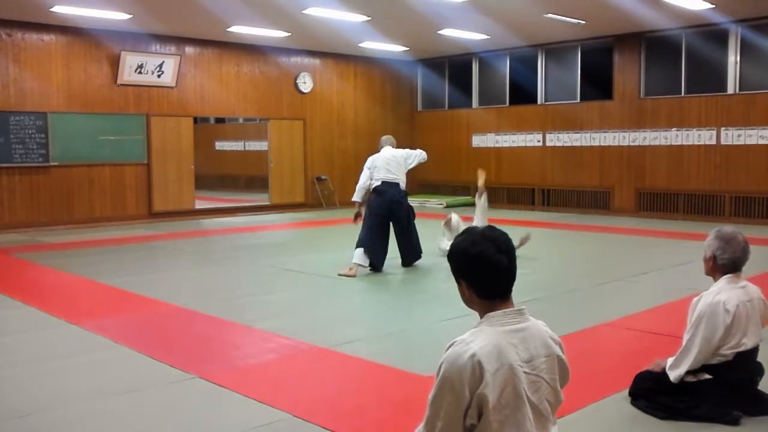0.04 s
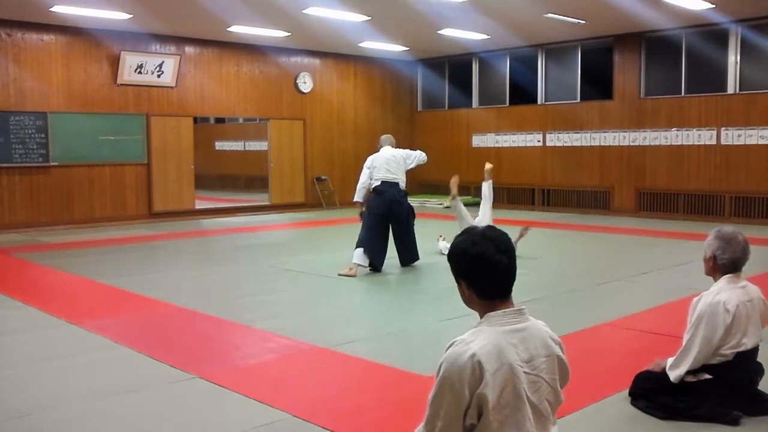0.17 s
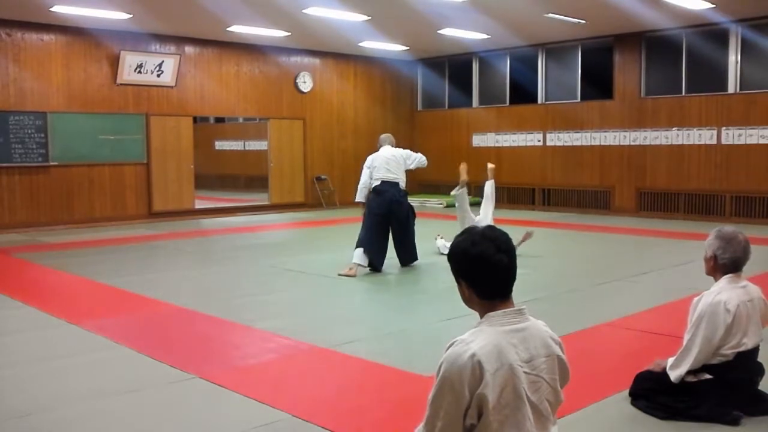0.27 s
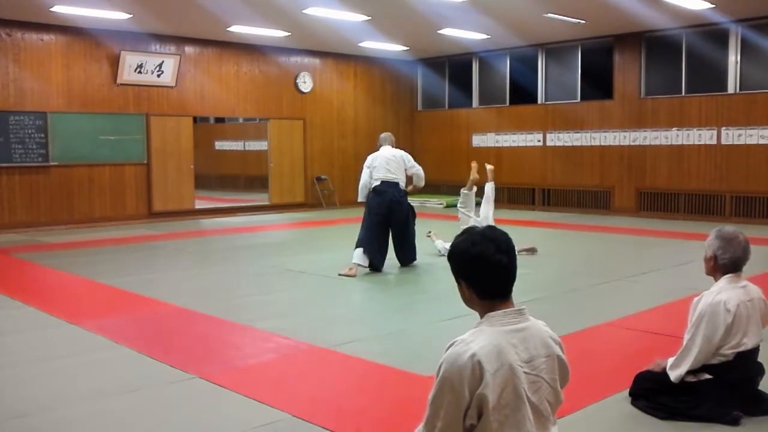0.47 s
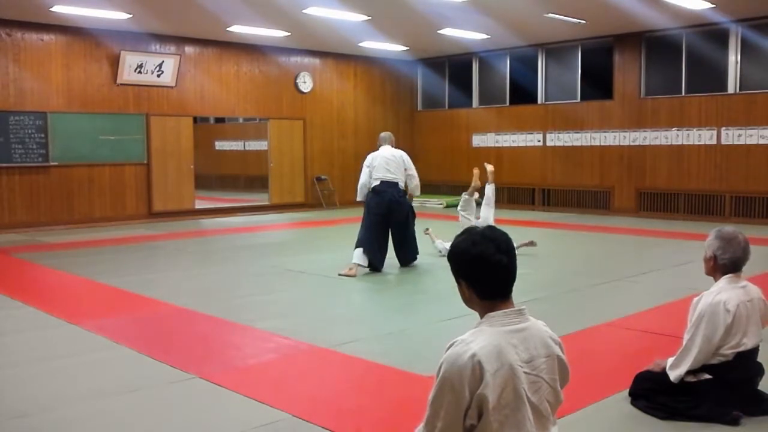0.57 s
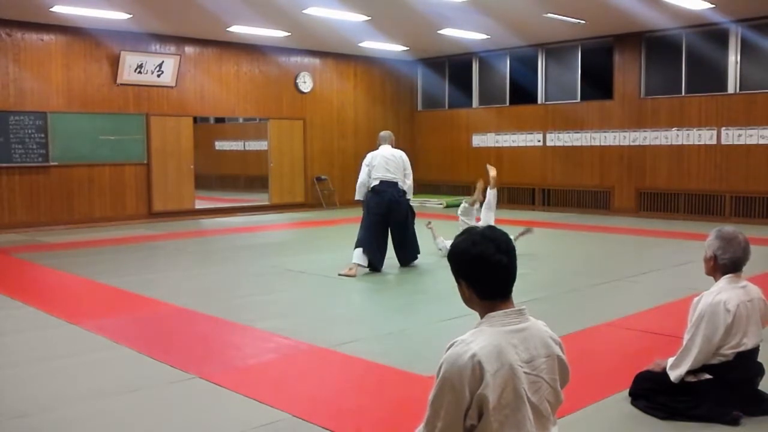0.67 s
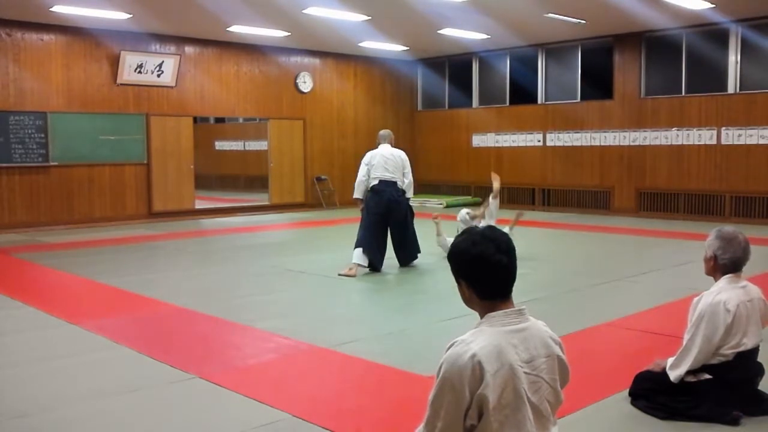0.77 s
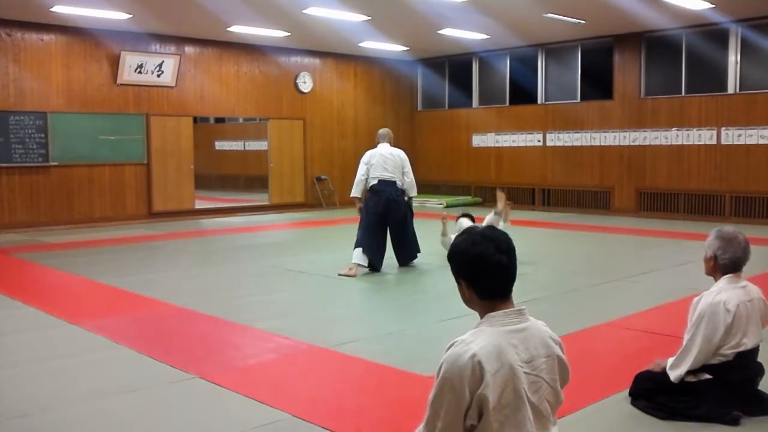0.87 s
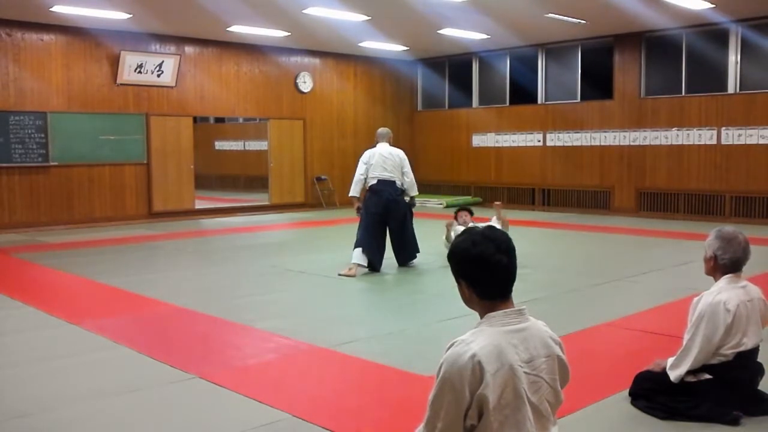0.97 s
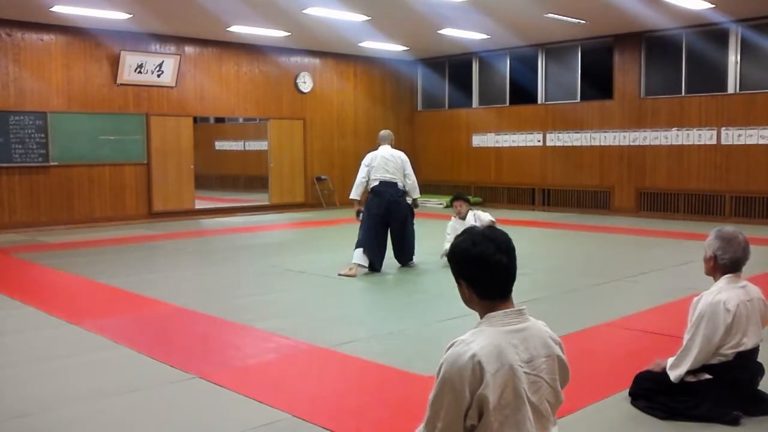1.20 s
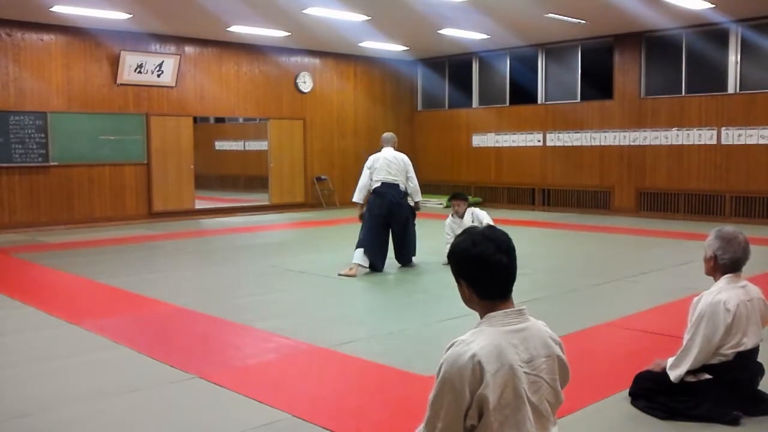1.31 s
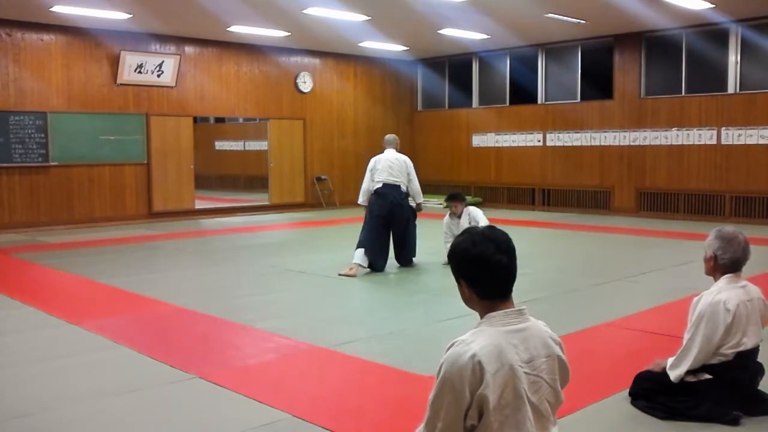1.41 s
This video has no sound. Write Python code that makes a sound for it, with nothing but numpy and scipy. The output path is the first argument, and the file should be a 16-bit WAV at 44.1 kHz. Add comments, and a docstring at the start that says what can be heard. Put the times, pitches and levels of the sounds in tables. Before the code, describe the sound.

After a faint cloth swish and low floor rumble, a thrown body hits padded mats with a sharp slap and deep boom; the hall echoes for about a second, heard from a distance over faint hum.

```python
"""A person is thrown onto padded mats in a wood-panelled training hall.
Limbs and back slap the mat covers as noise cracks; padding and sprung floor boom as damped sines.
The hall answers with bands of noise that each die at their own rate, about a second in all.
Cloth swishes and footwork rumbles before the landing, and a light touch on the mat follows it.
Mains hum, hiss and room rumble lie under it all, and the loudest peaks overload."""
import sys
import numpy as np
from scipy import signal
from scipy.fft import rfft, irfft
from scipy.io import wavfile

SR = 44100
rng = np.random.default_rng(int(sys.argv[2]) if len(sys.argv) > 2 else 0)


def log_audio(samples):
    """Write samples as a 16-bit WAV file to the path given in sys.argv[1]."""
    # one column per channel
    frames = np.atleast_2d(samples).T
    # limit to full scale, then quantise
    limited = np.clip(frames, -1, 1)
    pcm = np.round(limited * 32767).astype(np.int16)
    wavfile.write(sys.argv[1], SR, pcm)


N = 63945  # length in samples, 1.45 s
LANDING_S = 0.2435


def undb(db):
    """Decibels to gain."""
    return 10 ** (np.asarray(db) / 20)


def since(start):
    """Seconds since a moment, zero before it."""
    return np.maximum(np.arange(N) / SR - start, 0)


def along(hz, points, axis=1):
    """Read a column of a table on a log-frequency axis."""
    points = np.array(points, float)
    log_hz = np.log(np.maximum(hz, 1))
    return np.interp(log_hz, np.log(points[:, 0]), points[:, axis])


def noise(colour):
    """Noise of rms 1 with the given spectrum, falling away below its first point."""
    hz = np.arange(N // 2 + 1) * SR / N
    low_cut = np.minimum(hz / colour[0][0], 1) ** 2
    gain = undb(along(hz, colour)) * low_cut
    random_phase = np.exp(2j * np.pi * rng.random(len(hz)))
    x = irfft(gain * random_phase, N)
    return x / x.std()


def decay_time(t60):
    """Time constant of an exponential that falls 60 dB in t60 seconds."""
    return t60 / np.log(1000)


def burst(start, rise, decay):
    """Quick rise and exponential fall, both given as time constants in seconds."""
    t = since(start)
    return (1 - np.exp(-t / rise)) * np.exp(-t / decay)


def ring(modes, rise):
    """Damped sine modes set going by the landing."""
    t = since(LANDING_S)
    out = 0
    for hz, db, t60 in modes:
        envelope = burst(LANDING_S, rise, decay_time(t60))
        out = out + undb(db) * envelope * np.sin(2 * np.pi * hz * t)
    return out


# Slaps on the mat cover.
# Each row: start in seconds, level in dB relative to SLAP_DB, decay time constant in seconds.
SLAPS = [(0.2419, -8, 0.0018), (0.2443, 1, 0.0045), (0.2513, -2.5, 0.0074), (.2645, -7, 0.0016),
         (0.2815, -5, 0.0061), (0.2805, 10, 0.001), (0.2881, -10.5, 0.013)]
# Colour of a slap. Each row: frequency in Hz, relative spectrum level in dB.
SLAP_COLOUR = [(300, 6), (500, 4.5), (950, 4.5), (2000, -4.5), (3500, -1), (5000, -6), (8200, 3), (9500, 1),
               (10600, 7.5), (11800, -3.5), (15500, -6.5)]
SLAP_DB, SLAP_RISE_S = -4, 0.0013


def slaps():
    """Limbs and back hit the cover within 50 ms, each with a bright crack of noise."""
    power = 0
    for start, db, decay in SLAPS:
        power = power + (undb(db) * burst(start, SLAP_RISE_S, decay)) ** 2
    return undb(SLAP_DB) * np.sqrt(power) * noise(SLAP_COLOUR)


# Dull knock of the padding.
# Each row: pitch in Hz, level in dB before the rise softens it, time to fall 60 dB in seconds.
KNOCK_MODES = [(331, -6.5, 0.04), (464, -8.5, 0.071)]
KNOCK_RISE_S = 0.0026


def padding_knock():
    """The padding under the cover answers the landing with short damped modes."""
    return ring(KNOCK_MODES, KNOCK_RISE_S)


# Modes of the sprung floor.
# Each row: pitch in Hz, level in dB before the rise softens it, time to fall 60 dB in seconds.
FLOOR_MODES = [(58.67, -14, 0.6), (80, -23, 0.57), (111.6, -16, 0.55), (157.4, -22, 0.98),
               (207, -36.5, 0.3), (257, -25, 0.69), (431.5, -21, 0.46)]
# The floor heaves as the body lands, settles and rolls back.
# Each row: start in seconds, pitch in Hz, peak envelope level in dB, length in seconds.
HEAVES = [(0.2437, 101.9, -5.5, 0.0342), (0.28, 223, -19, .04), (0.313, 68.4, -15.5, 0.033),
          (0.344, 82, -10.5, 0.036), (0.399, 94.7, -18.5, 0.053), (.445, 111, -24.5, 0.069),
          (0.514, 57.6, -23.5, 0.027)]
FLOOR_RISE_S = 0.02


def floor():
    """The sprung floor rings in its modes and heaves for a few cycles at each shift of weight."""
    out = ring(FLOOR_MODES, FLOOR_RISE_S)
    for start, hz, db, length in HEAVES:
        t = since(start)
        swell = np.sin(np.pi * np.minimum(t / length, 1))  # half a sine, then silence
        out = out + undb(db) * swell * np.sin(2 * np.pi * hz * t)
    return out


# The hall's answer, band by band.
# Each row: band centre in Hz, relative spectrum level in dB, time to fall 60 dB in seconds.
HALL = [(25, -8, .9), (50.7, 21, 0.6), (97, 18, 1.03), (161, 16, 0.63), (231, 8.5, 0.91), (398, 11.5, 0.93),
        (685, -3.5, 1.16), (923, 7, 0.64), (1110, -4, 1.39), (1540, 0.5, 1.4), (2190, -5.5, 1.75),
        (2743, 4, 1.6), (3170, -7.5, 1.7), (3520, -5, 1.65), (5800, -4.5, 1.364), (8100, -4.5, 1.15),
        (10400, 1.5, .8), (10440, 2, 0.82), (11400, -4.5, 0.79), (15500, -16.5, 0.44)]
# What feeds the hall.
# Each row: start in seconds, level in dB before the build-up, build-up in seconds before the low lag.
HALL_FEEDS = [(0.245, -17, 0.0039), (0.282, -14, 0.0081)]
LOW_LAG_S, LOW_LAG_HZ = 0.015, 364  # echoes below this pitch build up later


def hall():
    """Diffuse echoes build up, the lows last; each band dies at its own rate, upper mids linger."""
    spectrum = rfft(noise(HALL))
    log_hz = np.log(np.maximum(np.arange(len(spectrum)) * SR / N, 1))
    centres = np.log([row[0] for row in HALL])
    out = 0
    # each share is 1 at its own band and 0 at the others, so neighbours crossfade
    for share, (hz, _, t60) in zip(np.eye(len(HALL)), HALL):
        band = irfft(spectrum * np.interp(log_hz, centres, share), N)
        lag = LOW_LAG_S / (1 + (hz / LOW_LAG_HZ) ** 2)
        power = 0
        for start, db, rise in HALL_FEEDS:
            power = power + (undb(db) * burst(start, rise + lag, decay_time(t60))) ** 2
        out = out + band * np.sqrt(power)
    return out


EARLY_ROUGH_DB, EARLY_FADE_S, EARLY_GRAIN_S = 2, 0.17, 0.003  # the first echoes arrive in clumps


def clumps(start):
    """Gain that flickers while the echoes are sparse and steadies as they thicken."""
    knots = np.arange(0, N / SR, EARLY_GRAIN_S)
    flicker = np.interp(since(0), knots, rng.standard_normal(len(knots)))
    return undb(EARLY_ROUGH_DB * flicker * np.exp(-since(start) / EARLY_FADE_S))


# Swish of the uniform in flight. Each row: time in seconds, rms level in dB.
SWISH = [(0, -42.5), (0.032, -43.5), (.13, -47), (.2, -51), (.26, -54)]
# Colour of the swish. Each row: frequency in Hz, relative spectrum level in dB.
SWISH_COLOUR = [(150, 4), (400, 0), (800, -5), (1500, -1), (2400, -0.5), (3500, -4.5), (7000, -5),
                (10500, 0), (12500, -9), (15500, -27)]


def swish():
    """Cloth rubs through the air as fading noise, silent after the last row of its table."""
    times, db = np.array(SWISH).T
    return np.interp(since(0), times, undb(db), right=0) * noise(SWISH_COLOUR)


# Colour of the footwork rumble. Each row: frequency in Hz, relative spectrum level in dB.
FOOTWORK_COLOUR = [(15, 8.5), (35, 4.5), (70, 0), (120, -21.5), (250, -43.5)]
FOOTWORK_DB, FOOTWORK_END_S = -30.5, 0.85  # rms level at the start, and when it has died away


def footwork():
    """The floor still rumbles from the last steps, low noise fading in a straight line."""
    fade = np.maximum(1 - since(0) / FOOTWORK_END_S, 0)
    return undb(FOOTWORK_DB) * fade * noise(FOOTWORK_COLOUR)


# Colour of the touch. Each row: frequency in Hz, relative spectrum level in dB.
TOUCH_COLOUR = [(250, -2), (450, 1), (750, -16), (1800, -14), (4000, -19.5), (10000, -15.5), (13000, -28)]
TOUCH_S, TOUCH_DB, TOUCH_DECAY_S = 1.3, -44, 0.017  # level is before the rise softens it


def touch():
    """A hand or foot brushes the mat as the person sits up, one short burst of noise."""
    return undb(TOUCH_DB) * burst(TOUCH_S, KNOCK_RISE_S, TOUCH_DECAY_S) * noise(TOUCH_COLOUR)


# Mains hum. Each row: multiple of the mains frequency, rms level in dB.
HUM = [(1, -39.5), (3, -47.5), (5, -55), (7, -64), (9, -70.5)]
# Colour of the hiss. Each row: frequency in Hz, relative spectrum level in dB.
HISS = [(500, -0.5), (850, -2), (1500, -7.5), (2600, -3.5), (4000, -12), (6000, -16.5), (8500, -17.5),
        (10200, -4.5), (11200, -10), (12500, -16), (15500, -25)]
# Colour of the room rumble. Each row: frequency in Hz, relative spectrum level in dB.
RUMBLE_COLOUR = [(20, -2), (45, 9.5), (110, -2.5), (200, -12.5), (400, -8.5), (900, -29)]
MAINS_HZ = 60
HISS_DB, RUMBLE_DB = -55, -49.5  # rms levels


def background():
    """Mains hum in odd harmonics, a thin hiss and faint room rumble, all steady."""
    turn = 2 * np.pi * MAINS_HZ * since(0) - np.pi / 2
    hum = 0
    for multiple, db in HUM:
        hum = hum + np.sqrt(2) * undb(db) * np.cos(round(multiple) * turn)
    hiss = undb(HISS_DB) * noise(HISS)
    rumble = undb(RUMBLE_DB) * noise(RUMBLE_COLOUR)
    return hum + hiss + rumble


def scene():
    """The throw, the landing and the hall, in one channel."""
    landing = slaps() + padding_knock() + floor()
    echoes = hall() * clumps(LANDING_S)
    movement = swish() + footwork() + touch()
    return (landing + echoes + movement + background())[None]


OVERLOAD = 0.53  # amplitude that the peaks are squeezed towards
TOP_HZ = 15800


def record(dry):
    """The recorder flattens the loudest peaks, then a steep low-pass cuts the top."""
    held = dry / (1 + (dry / OVERLOAD) ** 6) ** (1 / 6)
    low_pass = signal.ellip(10, 0.2, 80, TOP_HZ, fs=SR, output="sos")
    return signal.sosfilt(low_pass, held)


dry = scene()
out = record(dry)
log_audio(out)
```